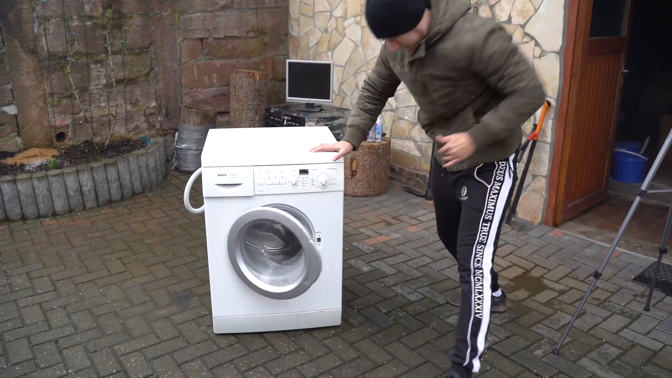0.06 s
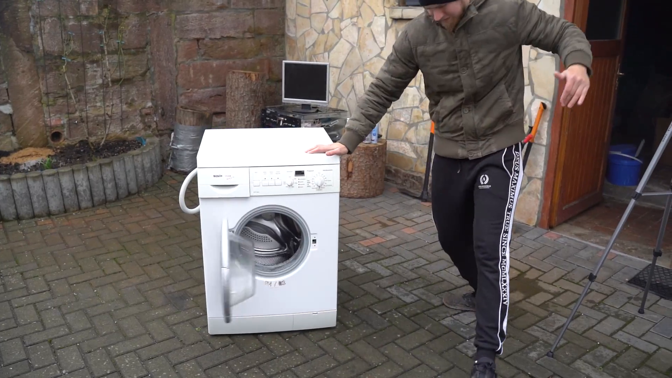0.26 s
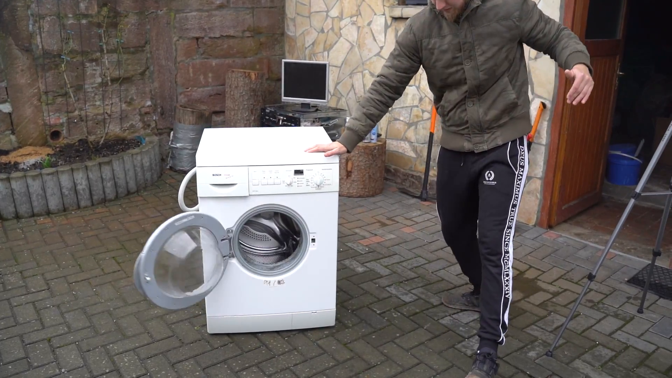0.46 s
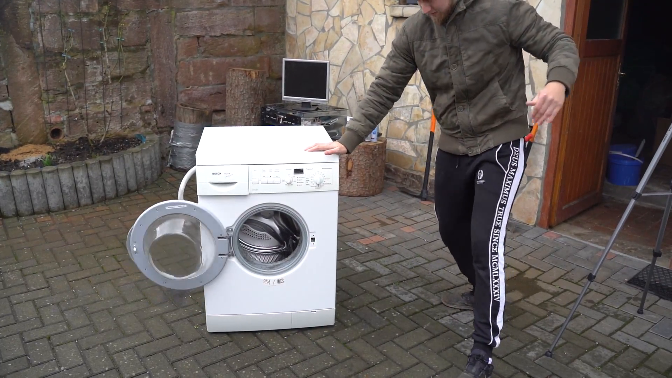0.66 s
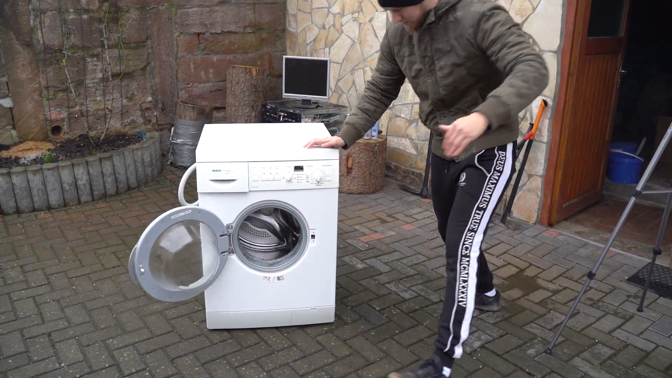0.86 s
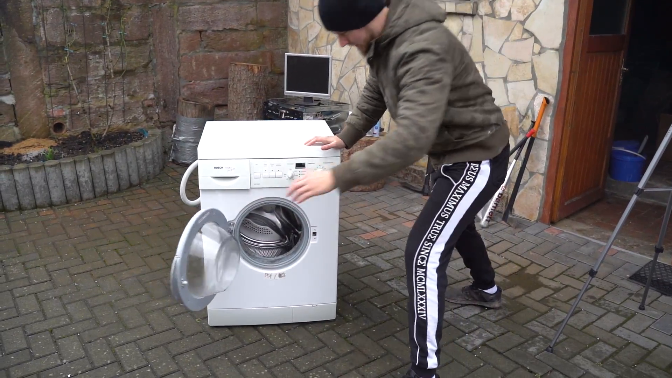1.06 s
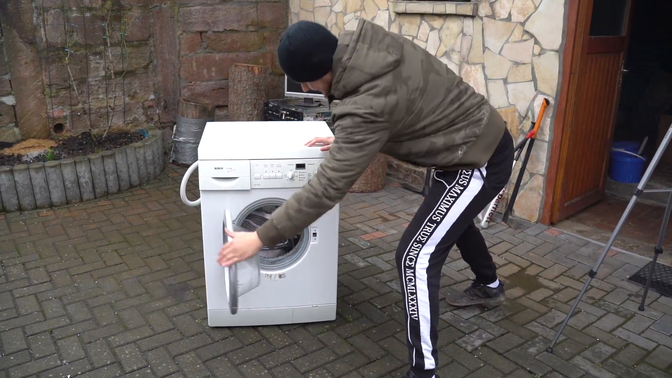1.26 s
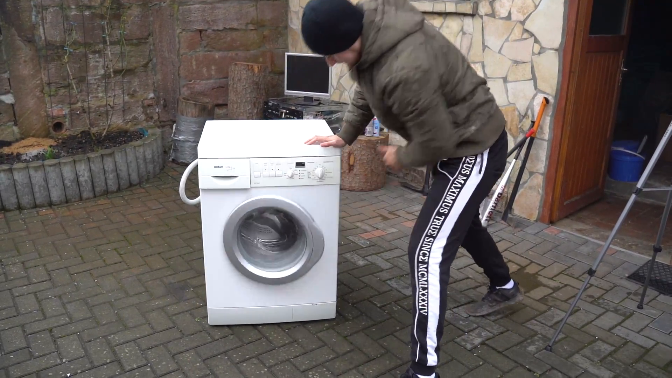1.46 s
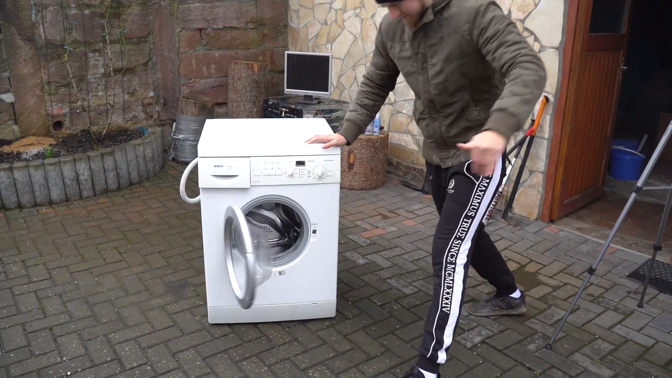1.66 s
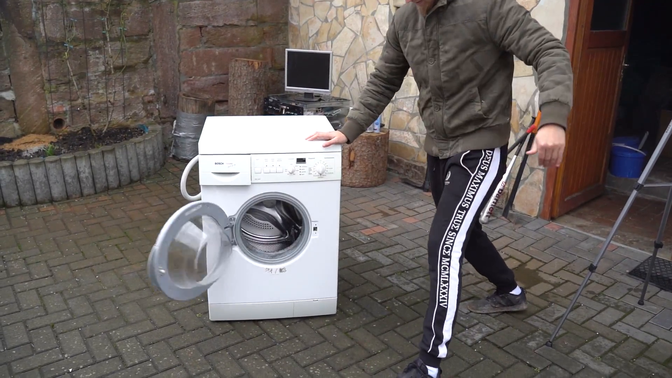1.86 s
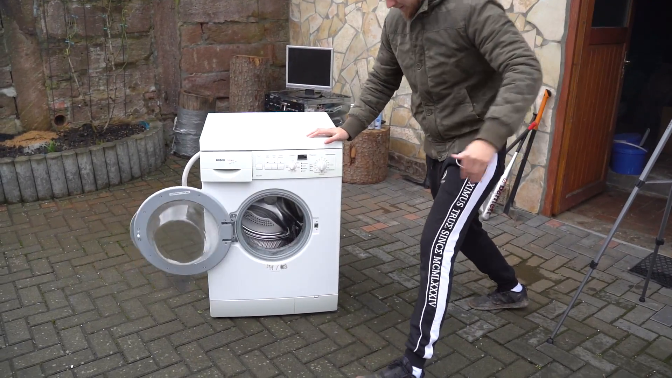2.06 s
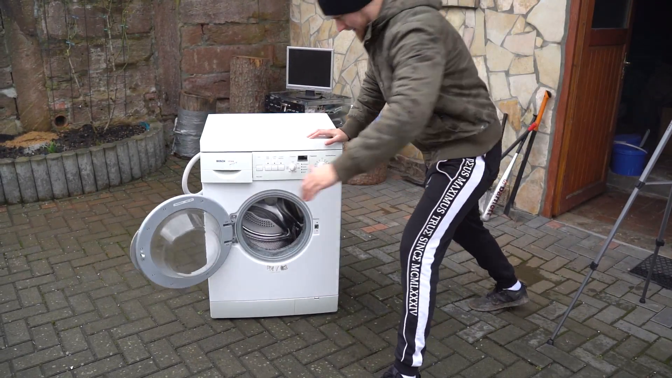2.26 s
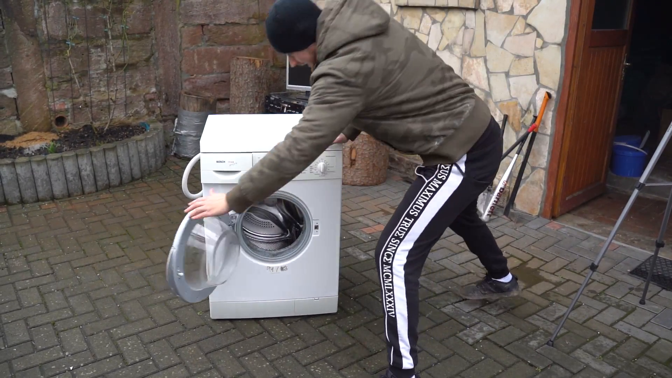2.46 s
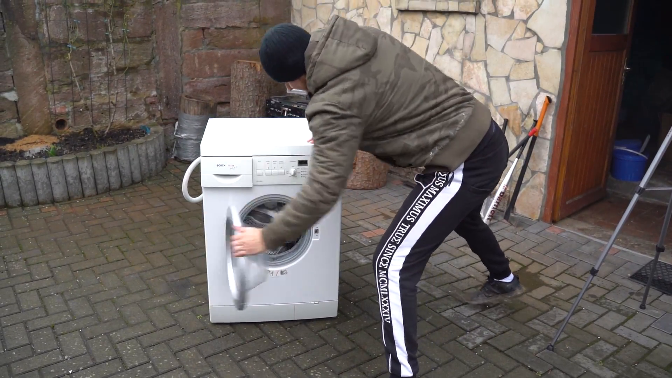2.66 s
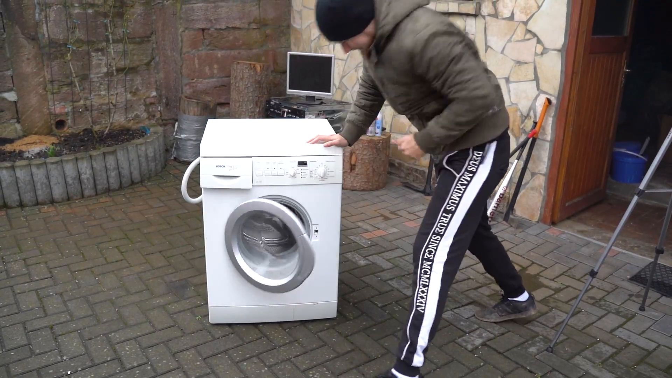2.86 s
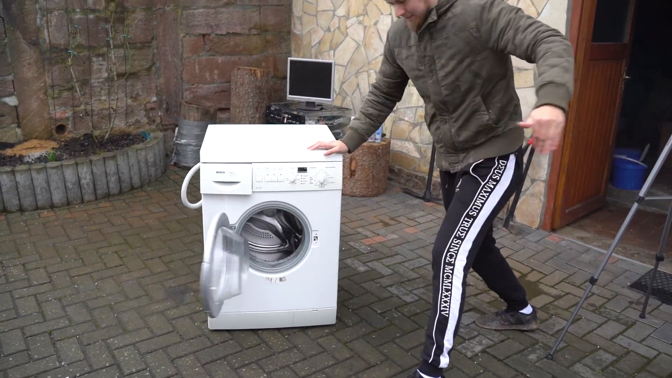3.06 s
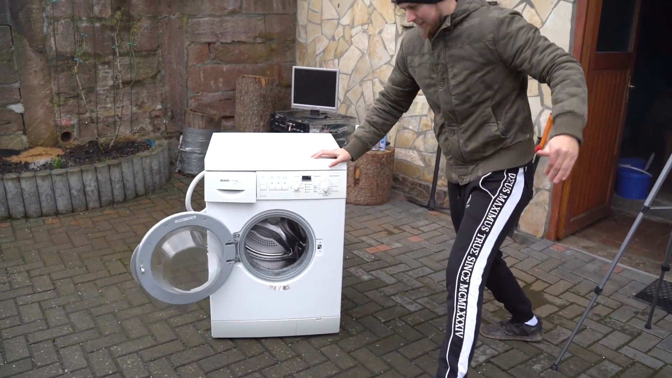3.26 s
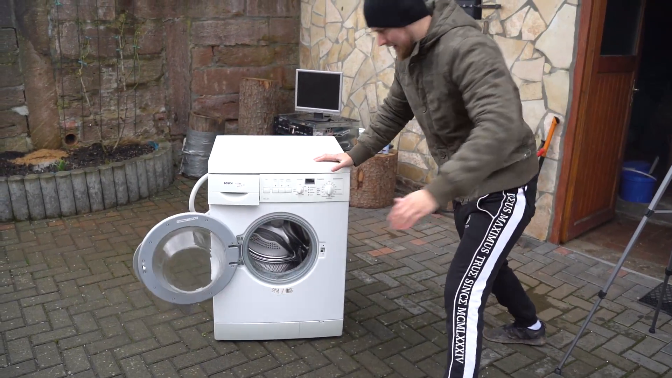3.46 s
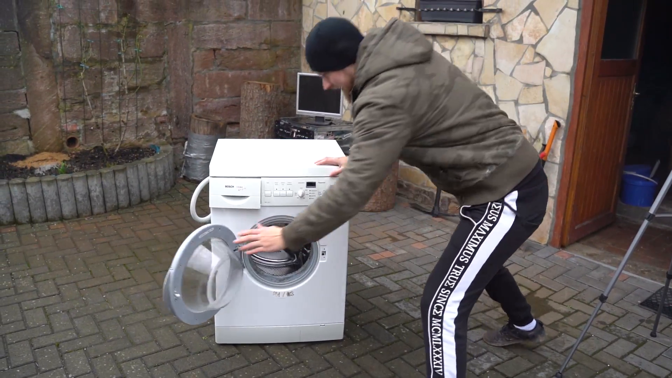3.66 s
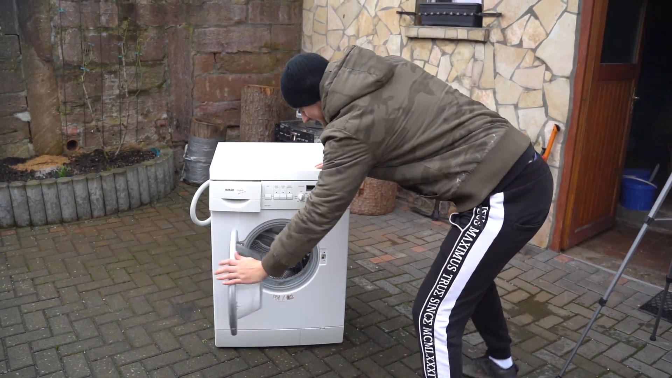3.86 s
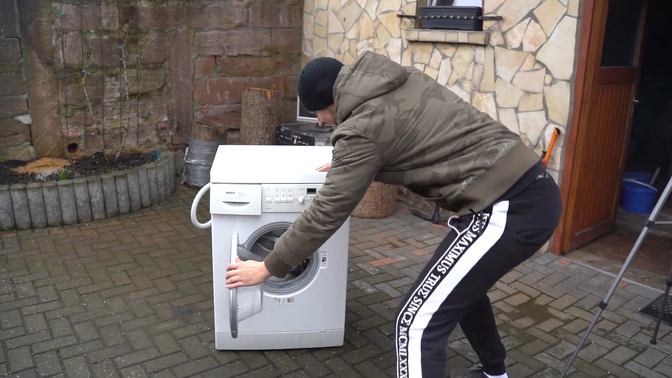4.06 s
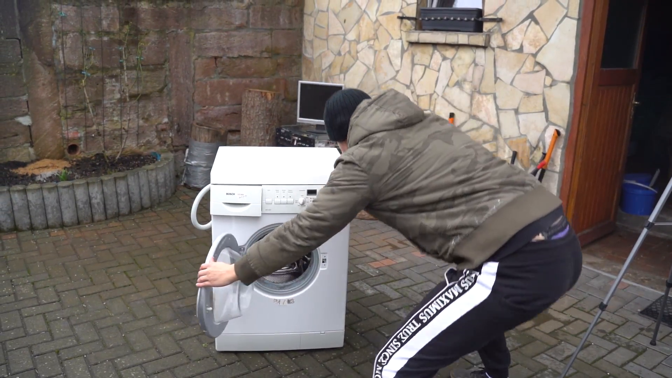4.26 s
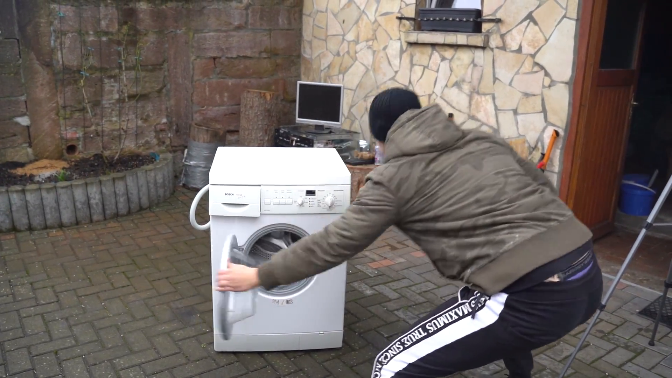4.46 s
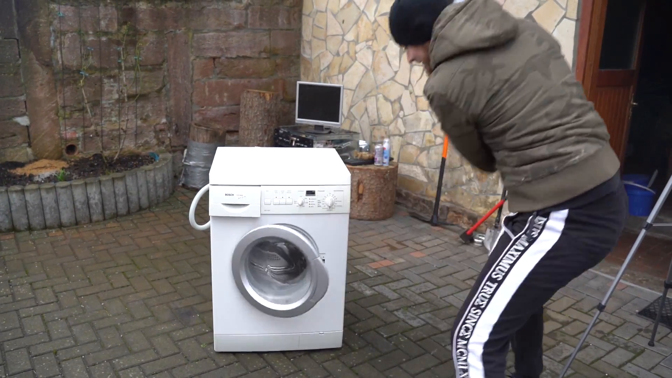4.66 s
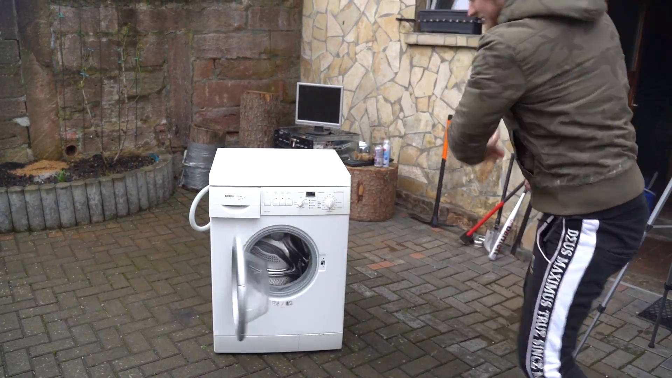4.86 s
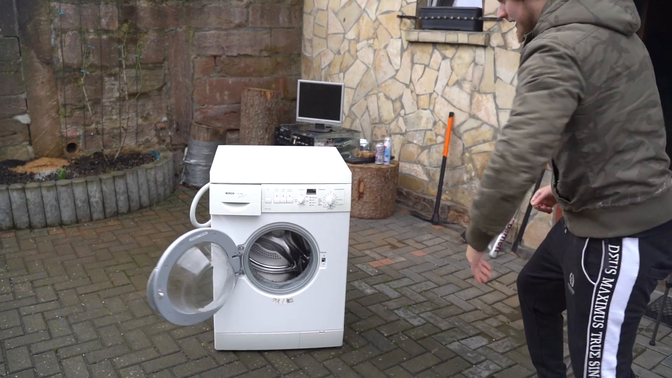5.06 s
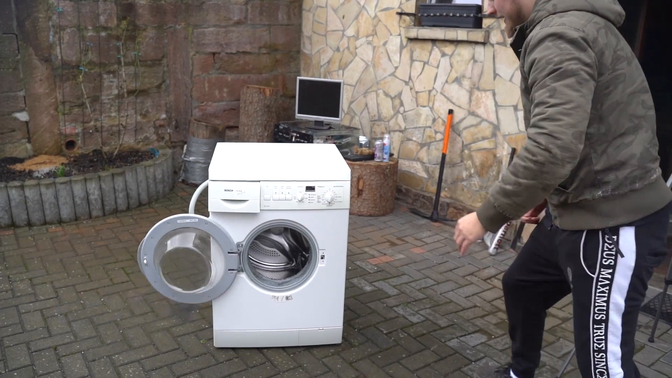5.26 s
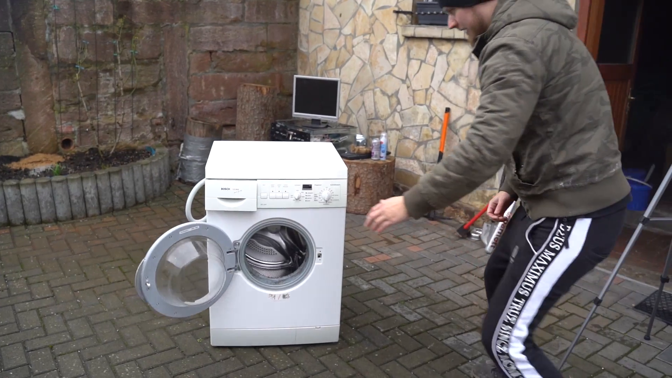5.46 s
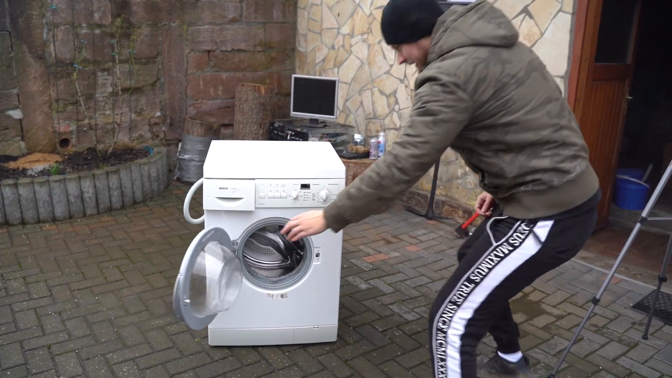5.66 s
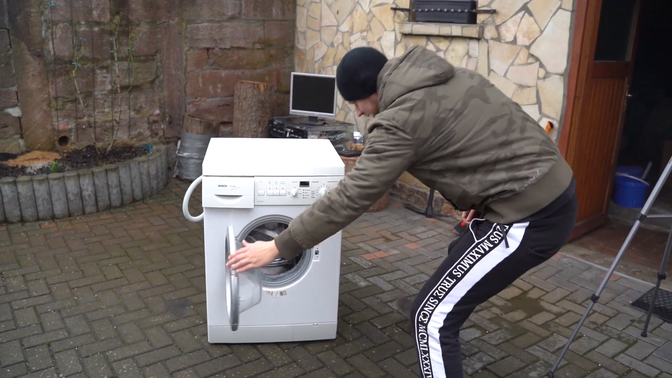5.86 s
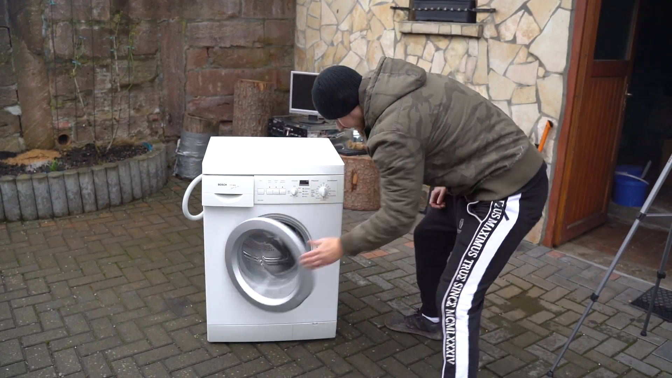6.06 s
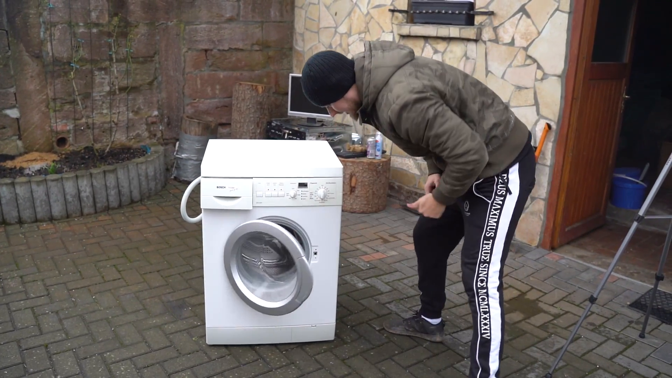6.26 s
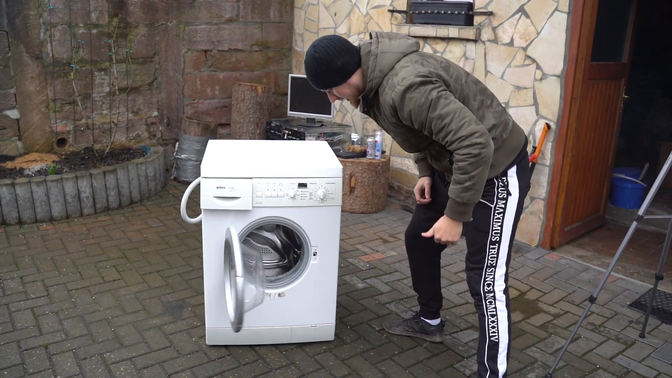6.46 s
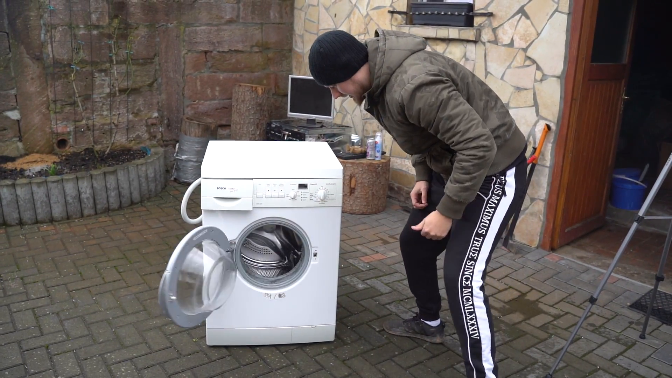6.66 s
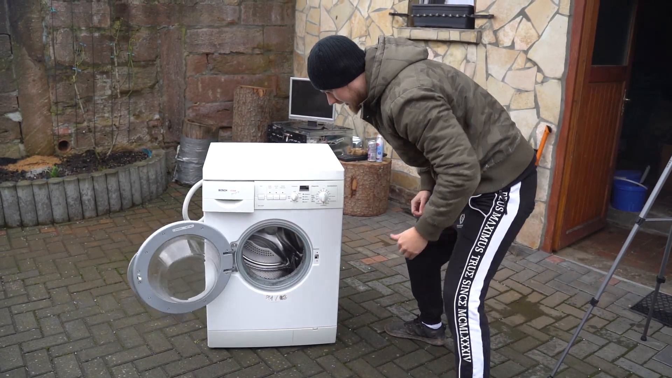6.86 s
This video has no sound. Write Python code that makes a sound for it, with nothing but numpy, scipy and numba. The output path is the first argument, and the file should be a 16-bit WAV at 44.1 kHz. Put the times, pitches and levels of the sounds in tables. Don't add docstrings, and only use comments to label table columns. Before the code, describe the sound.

A washing machine's round door is slammed five times in a paved yard, each metallic bang booming and rattling before the door knocks open.

```python
import sys
import numpy as np
from scipy import signal
from scipy.fft import rfft, irfft, next_fast_len
from scipy.io import wavfile
from scipy.ndimage import uniform_filter1d
from numba import njit

SR = 44100
rng = np.random.default_rng(int(sys.argv[2]) if len(sys.argv) > 2 else 0)


def invert_db(level):
    return 10 ** (np.asarray(level, dtype=float) / 20)


def dump(signal):
    limited = np.clip(np.atleast_2d(signal).T, -1, 1)
    pcm = np.round(limited * 32767).astype(np.int16)
    wavfile.write(sys.argv[1], SR, pcm)


N = 304290
SPAN = 1 << 15
T = np.arange(SPAN) / SR


def read(table, hz):
    f, v = np.transpose(table)
    return np.interp(np.log(np.maximum(hz, 1)), np.log(f), v)


def unit(x):
    return x / np.sqrt(np.mean(x ** 2))


def add(out, x, start_s):
    i = int(start_s * SR)
    a, b = max(i, 0), min(i + x.shape[-1], N)
    out[:, a:b] += x[..., a - i:b - i]


def wide(size):
    # f/Hz, likeness [0-1]
    likeness = [(60, .98), (150, .89), (350, .64), (700, .45), (1400, .53), (2800, .2), (6000, .03)]
    top_hz = 15750
    hz = np.arange(size // 2 + 1) * SR / size
    alike = np.clip(read(likeness, hz), 0, 1)
    mid, side = rfft(rng.standard_normal((2, size))) * (hz < top_hz)
    mid = mid * np.sqrt((1 + alike) / 2)
    side = side * np.sqrt((1 - alike) / 2)
    return hz, mid + np.outer([1, -1], side)


def fade(t60_s, rise_s, hold_s=0):
    late_s = 0.026 * np.logaddexp(0, (T - hold_s) / .025) if hold_s else T
    return (1 - np.exp(-(T / rise_s) ** 1.5)) * invert_db(-60 * late_s / t60_s)


def flicker(depth_db, rate_hz):
    return invert_db(depth_db * unit(uniform_filter1d(rng.standard_normal(SPAN), int(SR / rate_hz))))


def burst(hz, octaves, rise_s, t60_s, coherent=False):
    f, noise = wide(SPAN)
    noise = noise[[0, 0]] if coherent else noise
    resonance = np.exp(-.5 * (np.log2(np.maximum(f, 1) / hz) / octaves) ** 2)
    return unit(irfft(noise * resonance)) * fade(t60_s, rise_s)


def touch(out, start_s, db, hz, octaves, rise_s, t60_s, grain_db=2.4):
    pan_db = -3.5 * min(hz / 2000, 1) * np.array([[.5], [-.5]])
    add(out, invert_db(db + pan_db) * flicker(grain_db, 310) * burst(hz, octaves, rise_s, t60_s), start_s)


def note(out, start_s, db, length_s, start_hz, end_hz, rough):
    u = np.linspace(0, 1, int(length_s * SR))
    flutter = unit(uniform_filter1d(rng.standard_normal(SPAN), 90))[:len(u)]
    pitch_hz = start_hz + (end_hz - start_hz) * u ** 2
    tone = np.sin(2 * np.pi * np.cumsum(pitch_hz) / SR + 1.3 * rough * flutter)
    swell = np.sqrt(np.sin(np.pi * u)) * (1 + rough * flutter)
    add(out, invert_db(db - 3.5) * swell * tone * invert_db([[-1.5], [1.5]]), start_s)


def clatter(colour, decays, rise_s, hold_s):
    hz, noise = wide(SPAN)
    noise = noise * invert_db(read(colour, hz))
    noise = noise / np.sqrt(np.mean(irfft(noise) ** 2))
    place = 2 * np.log2(np.maximum(hz, 1))
    out = 0
    for k in range(15, 29):
        band = irfft(noise * np.cos(np.pi / 2 * np.clip(place - k, -1, 1)) ** 2)
        band_hold_s = hold_s * (1 - 0.27 * (k - 15) / 13)
        out = out + band * flicker(1.76, 100) * fade(read(decays, 2 ** (k / 2)), rise_s, band_hold_s)
    return out


def boom(modes, cycles, hold_s, steady):
    f, noise = wide(SPAN)
    out = 0
    for hz, width_hz, db, t60_s in modes:
        detune, turn = rng.uniform(-1, 1, 2)
        shaken = irfft(noise / (1 + (2 * (f - hz) / width_hz) ** 2))
        shaken = shaken / np.sqrt(np.mean(shaken[:, :SPAN // 6] ** 2))
        free = np.sqrt(2) * np.sin(2 * np.pi * (hz + .3 * width_hz * detune) * T + np.pi * turn)
        mix = steady * free + (1 - steady) * shaken
        out = out + invert_db(db) * mix * fade(t60_s, cycles / hz, hold_s)
    return out


def traffic():
    # f/Hz, density [dB per Hz]
    spectrum = [(20, -26), (45, -3.5), (82, -10.5), (120, -8), (190, -15.5), (300, -14), (530, -13.5),
                (1040, -13), (2410, -26.5), (6000, -39), (12000, -49.5), (14000, -64)]
    # t/s, level/dB in 500-2000 Hz
    swell = [
        (0, -58),
        (1.15, -56.5),
        (2.4, -58.5),
        (4.05, -60),
        (5.5, -60.5),
        (6.9, -64),
    ]
    size = next_fast_len(N)
    hz, noise = wide(size)
    colour = invert_db(read(spectrum, hz))
    share = np.sum(colour[(hz > 500) & (hz < 2000)] ** 2) / np.sum(colour ** 2)
    level = invert_db(np.interp(np.arange(N) / SR, *np.transpose(swell)))
    return unit(irfft(noise * colour, size)[:, :N]) / np.sqrt(share) * level


def motor_drone(out):
    # t/s of peak, half width/s, level/dB, multiple of base pitch
    drifts = [
        (1.15, 0.36, -61.5, 1),
        (2.6, .3, -64.5, 1),
        (6.1, 0.97, -62, 1),
        (4.4, .5, -61, 2),
        (2.7, .6, -74, 2),
        (9.6, .4, -74, 2),
    ]
    t = np.arange(N) / SR
    waver = .6 * unit(uniform_filter1d(rng.standard_normal(N), 2500))
    turn = 2 * np.pi * 270 * t + waver
    for peak_s, lasts_s, db, multiple in drifts:
        out += invert_db(db) / (1 + ((t - peak_s) / lasts_s) ** 2) * np.sin(round(multiple) * turn)


def earlier_bang(out):
    # t/s, level/dB, f/Hz, width/octaves, t60/s
    tails = [
        (-.1, -40, 1300, 1, .6),
        (-.06, -29.5, 200, .65, .9),
        (-.01, -55, 8000, .63, .64),
    ]
    for s, db, hz, octaves, t60_s in tails:
        touch(out, s, db, hz, octaves, .008, t60_s)


def slams(out):
    # t/s, blow level/dB, crack level/dB, rattle time/s, air push level/dB
    blows = [
        (0.0305, -9, -5.5, 0.11, -21),
        (1.4859, -9, -2, 0.11, -11),
        (2.8204, -11, 0.5, 0.13, -11),
        (4.644, -12, 0.5, 0.13, -12.5),
        (6.1773, -11.5, -2.5, 0.086, -18),
    ]
    # f/Hz, width/Hz, level/dB, t60/s
    cabinet = [(41, 28, -14, 0.72), (67.5, 14, -6.5, 0.6), (108.1, 14, -0.5, 0.43), (156, 30, -2.5, 0.54),
               (181.6, 35, -7, .45), (268.8, 58, -2, 0.4), (319.5, 20, -10.5, 0.39),
               (346.7, 30, -6.5, 0.32), (396, 13, -13.5, 0.46), (608, 20, -18.5, 0.5),
               (808.6, 29, -16, 0.51), (1140, 26, -13, 0.35), (2040, 76, -17, .3)]
    # f/Hz, density [dB per Hz]
    colour = [(240, -31.5), (400, -5), (473, -6), (809, -2.5), (1030, -6), (1420, -6), (1660, -8.5),
              (6890, -16), (15500, -26)]
    # f/Hz, t60/s
    decays = [(400, 0.36), (1000, 0.3), (3000, 0.4), (7000, 0.34), (15000, 0.12)]
    lead_s = T[:int(.05 * SR)] - .05
    for s, db, crack_db, hold_s, push_db in blows:
        swing = np.exp(lead_s / .006) * np.sin(-2 * np.pi * 95 * lead_s + 0.38)
        add(out, invert_db(push_db) * swing, s + lead_s[0])
        hiss = np.exp(lead_s / 0.0082) * burst(1100, 1.1, .001, 9.)[:, :len(lead_s)]
        add(out, invert_db(push_db - 18.5) * hiss, s + lead_s[0])
        bang = invert_db(crack_db + 11.5) * burst(1700, 1.4, 0.00031, 0.016, coherent=True)
        bang = bang + clatter(colour, decays, .003, hold_s)
        bang = bang + invert_db(-3.5) * boom(cabinet, 1.5, hold_s, 0.25)
        add(out, invert_db(db - 8) * bang, s - .0004)


def thumps(out):
    # t/s, level/dB, f/Hz, t60/s
    events = [
        (.25, -46.5, 90, .59),
        (1.369, -28.5, 137, .25),
        (1.8, -48, 70, .35),
        (2.62, -48.5, 120, .3),
        (3.2, -40.5, 70, .2),
    ]
    for s, db, hz, t60_s in events:
        touch(out, s, db, hz, .55, .025, t60_s)


def ticks(out):
    # t/s, level/dB, f/Hz, t60/s
    events = [(.291, -53, 11000, 0.052), (.336, -54, 13500, 0.11), (.398, -62, 12000, .16),
              (.574, -64, 12000, .03), (.587, -61, 12800, 0.04), (1.064, -62.5, 5000, .11),
              (2.367, -56, 5000, .04), (3.999, -70, 7000, 0.276), (4.12, -69, 11000, .04),
              (5.1, -69, 11000, 0.036), (5.659, -54.5, 6870, 0.24)]
    for s, db, hz, t60_s in events:
        touch(out, s, db, hz, 0.56, .003, t60_s)


def rustles(out):
    # t/s, level/dB, f/Hz, t60/s
    events = [
        (.3, -62.5, 5000, 0.85),
        (.9, -73, 13000, 1.5),
        (2.35, -73, 13000, 1.),
        (2.521, -52, 6930, 0.14),
        (4, -69, 4900, .3),
        (4.35, -61.5, 4900, .4),
        (4.38, -56, 8500, .3),
        (5.655, -52, 2500, .2),
        (6.13, -56, 5000, .2),
    ]
    for s, db, hz, t60_s in events:
        touch(out, s, db, hz, .5, 0.028, t60_s)


def bird_trill(out):
    # t/s, level/dB
    syllables = [
        (.35, -73.5),
        (.427, -71.5),
        (.503, -69),
        (.594, -73.5),
    ]
    for s, db in syllables:
        note(out, s, db, .042, 6050, 6400, .65)


def stops(out):
    # t/s, tick level/dB, wait for thud/s, thud level/dB, rock level/dB
    knocks = [
        (0.6878, -25, 0.013, 6, 13.5),
        (2.1252, -24.5, 0.016, 4, 12.5),
        (3.3991, -25, 0.014, 4.5, 16),
        (5.2897, -26, 0.017, 2, 11.5),
    ]
    # f/Hz, width/Hz, level/dB, t60/s
    door = [(45, 12, -19.5, .5), (73.6, 28, -6, .35), (100, 50, -14.5, 1), (150.5, 50, -5.5, 0.39),
            (185.8, 20, -12, 0.67), (249, 33.7, -12, 0.53), (316.6, 103, -4.5, 0.34), (385, 73, -9.5, 0.35)]
    # f/Hz, density [dB per Hz]
    colour = [(240, -22), (400, -6), (666, -18), (777, -13), (1630, -17), (1820, -15), (7060, -26.5),
              (12900, -36), (16000, -42)]
    # f/Hz, t60/s
    decays = [(400, 0.26), (2000, 0.22), (6000, 0.2), (15000, 0.14)]
    rim_hz, rim_db, rim_t60_s = 364, 4.5, 0.065
    arm_hz, arm_db, arm_t60_s = 77, 9.5, 0.136
    rock_hz, rock_start_s, rebound_s, rebound_db = 102.2, 0.0387, .092, -15
    for s, db, wait_s, thud_db, rock_db in knocks:
        add(out, invert_db(db - 4.5) * burst(2300, 1.0, 0.0021, .09), s - .001)
        knock = burst(2400, 1.15, .0005, .02, coherent=True)
        thud = knock + invert_db(-4) * clatter(colour, decays, .004, 0.0052)
        add(out, invert_db(db + thud_db) * thud, s + wait_s)
        add(out, invert_db(db + thud_db - 6.5) * boom(door, 2.1, 0.0275, 0.26), s + .6 * wait_s)
        for hz, ring_db, t60_s in ((rim_hz, rim_db, rim_t60_s), (arm_hz, arm_db, arm_t60_s)):
            ring = np.sin(2 * np.pi * hz * T)[None] * fade(t60_s, 1.9 / hz)
            add(out, invert_db(db + ring_db) * ring, s + wait_s - 0.58 / hz)
        turn = 2 * np.pi * rock_hz * T + 1.66
        rock = (np.cos(turn) + 0.14 * np.cos(2 * turn)) * fade(0.093, 0.0087, 0.03376)
        rock = rock * invert_db(db + rock_db)
        add(out, rock, s + rock_start_s)
        add(out, invert_db(rebound_db) * rock, s + rock_start_s + rebound_s)


def grips(out):
    # t/s, level/dB, body f/Hz, t60/s, skin slap level/dB
    events = [
        (.963, -32, 353, .05, -66),
        (1.354, -30, 266, .2, -56),
        (5.656, -46, 296, .09, -49.5),
        (6.035, -44, 230, .13, -56.5),
        (6.685, -58, 270, .11, -74.5),
        (6.824, -51, 398, .072, -75),
    ]
    for s, db, hz, t60_s, slap_db in events:
        touch(out, s, db, hz, 0.31, .003, t60_s)
        touch(out, s, slap_db, 3000, .8, 0.0033, .5 * t60_s)


def latch_hook(out):
    # t/s, level/dB
    rubs = [
        (1.452, -45),
        (4.596, -33),
    ]
    # f/Hz, width/octaves, level/dB, t60/s
    hook = [(1470, .22, -0.5, 0.22), (2500, .2, 0, 0.12), (4700, .1, -8, .06), (8730, .4, -13.5, 0.029)]
    for s, db in rubs:
        for hz, octaves, part_db, t60_s in hook:
            touch(out, s, db + part_db, hz, octaves, .002, t60_s)


def squeaks(out):
    # t/s, length/s, f/Hz, level/dB, roughness [0-1]
    events = [
        (3.568, .079, 5500, -64, .47),
        (4.465, .065, 7330, -45, .05),
        (4.533, .033, 7300, -55, .2),
        (5.668, .05, 5420, -61, .6),
        (6.805, .07, 7880, -77, .6),
        (6.81, .06, 7090, -82.5, .3),
    ]
    for s, length_s, hz, db, rough in events:
        note(out, s, db, length_s, hz, hz * (1 - 2 * .03 * rough), rough)


def bird_calls(out):
    # t/s, level/dB
    calls = [
        (3.948, -73.5),
        (4.09, -73),
        (4.23, -69.5),
        (5.44, -81.5),
        (5.597, -75.5),
        (5.77, -73),
        (5.81, -78.5),
    ]
    for s, db in calls:
        note(out, s, db, .055, 7500, 6100, .35)


def skid(out):
    # f/Hz, width/octaves, level/dB, t60/s
    sole = [(1950, 0.23, 0, 0.22), (2908, 0.36, -4, .28), (5000, 0.33, -6, 0.23), (10000, 0.77, -8, .17)]
    # t/s, level/dB, f/Hz
    grit = [
        (4.4222, -22, 1950),
        (4.4283, -13, 1980),
        (4.4378, -12.5, 2280),
        (4.462, -28, 2000),
    ]
    for hz, octaves, part_db, t60_s in sole:
        touch(out, 4.408, -21.5 + part_db, hz, octaves, .028, t60_s, grain_db=3.0)
    for s, db, hz in grit:
        touch(out, s, db, hz, 0.2, 0.00062, 0.018)


def scene():
    out = traffic()
    for source in (motor_drone, earlier_bang, slams, thumps, ticks, rustles, bird_trill, stops, grips,
                   latch_hook, squeaks, bird_calls, skid):
        source(out)
    return out


def capsules(x):
    x = signal.sosfilt(signal.butter(3, 38, "high", fs=SR, output="sos"), x)
    treble = signal.sosfilt(signal.butter(1, 6000, "high", fs=SR, output="sos"), x)
    tilt_db = 1 * np.array([[.5], [-.5]])
    return x + (invert_db(tilt_db) - 1) * treble


@njit
def follow(x, attack, release):
    e, y = 1e-6, np.empty(len(x))
    for i in range(len(x)):
        e += (x[i] - e) * (attack if x[i] > e else release)
        y[i] = e
    return y


def limiter(x):
    limit_db, ratio, attack_s, release_s = -11.5, 6.5, .0025, 0.052
    e = follow(np.abs(x).max(0), 1 / (attack_s * SR), 1 / (release_s * SR))
    gain = np.minimum(1, invert_db(limit_db) / e) ** (1 - 1 / ratio)
    return 0.91 * np.tanh(x * gain / 0.88)


def band_limit(x):
    return signal.sosfilt(signal.butter(12, 16670, fs=SR, output="sos"), x)


def record(dry):
    mix = limiter(capsules(dry))
    return band_limit(mix)


dry = scene()
out = record(dry)
dump(out)
```